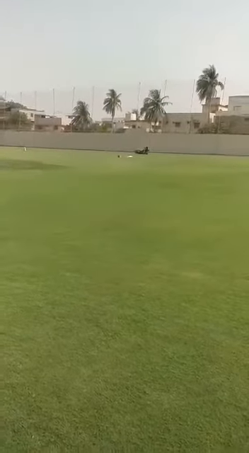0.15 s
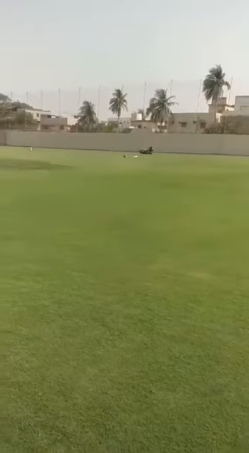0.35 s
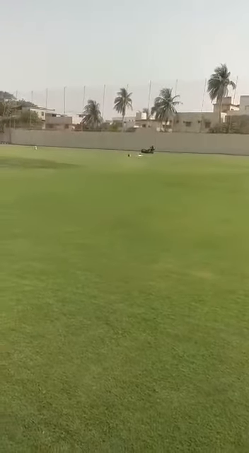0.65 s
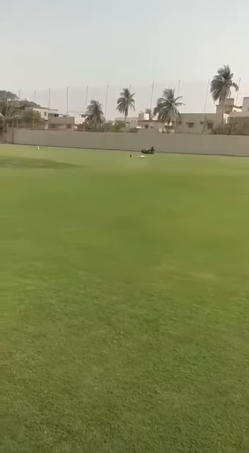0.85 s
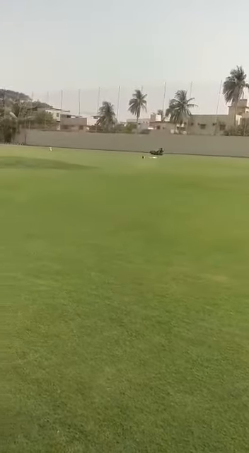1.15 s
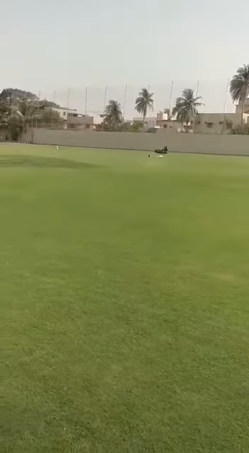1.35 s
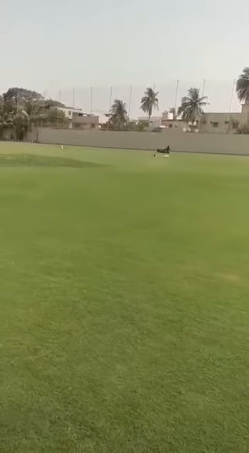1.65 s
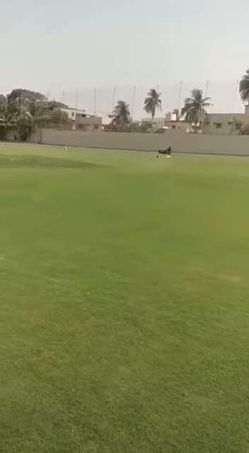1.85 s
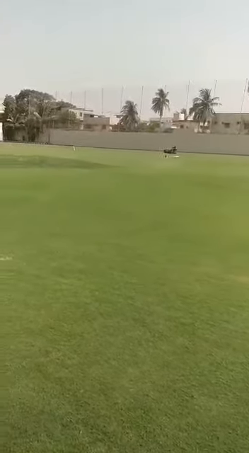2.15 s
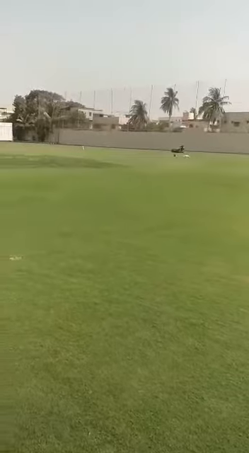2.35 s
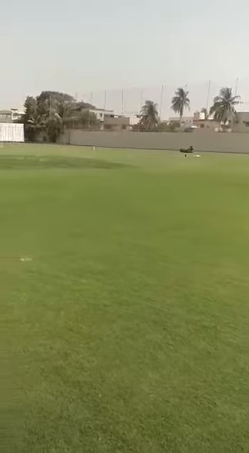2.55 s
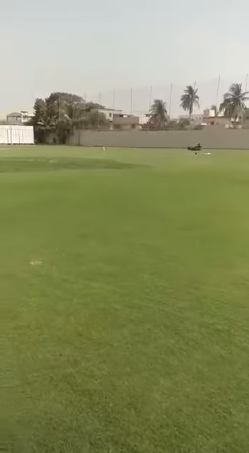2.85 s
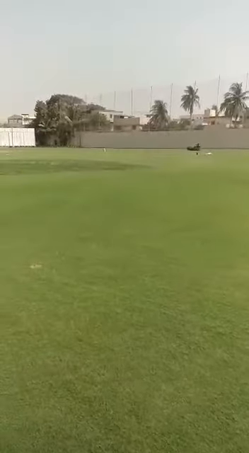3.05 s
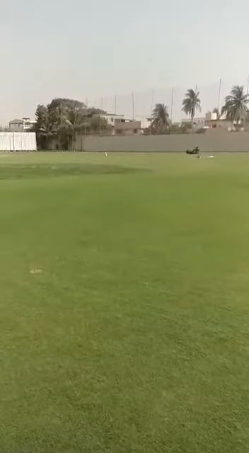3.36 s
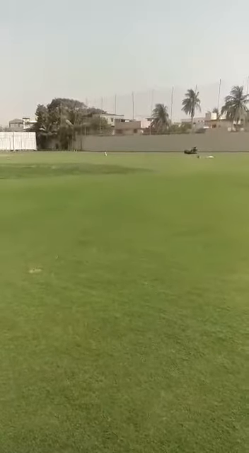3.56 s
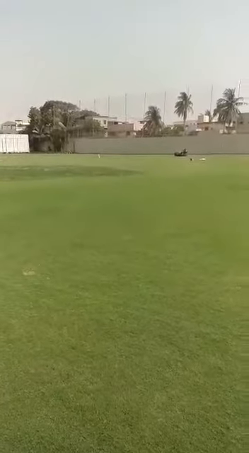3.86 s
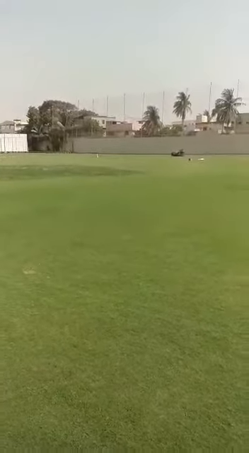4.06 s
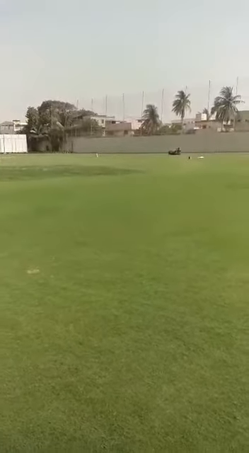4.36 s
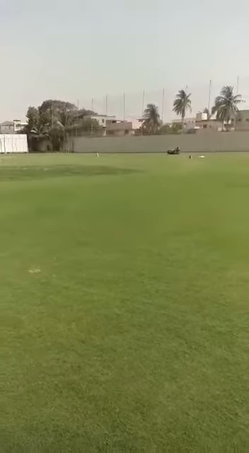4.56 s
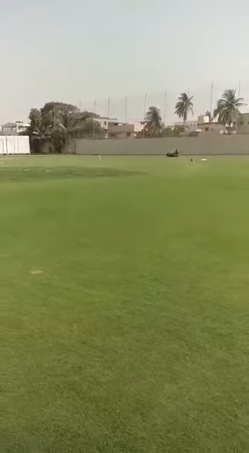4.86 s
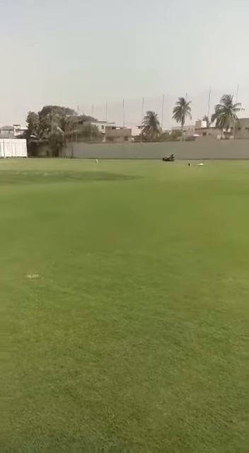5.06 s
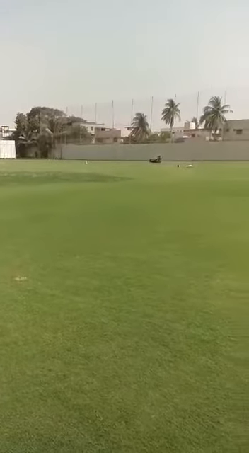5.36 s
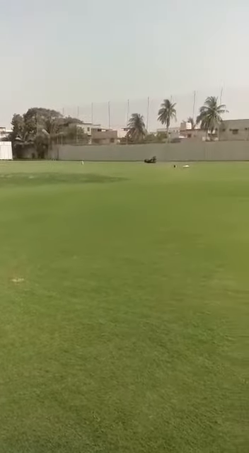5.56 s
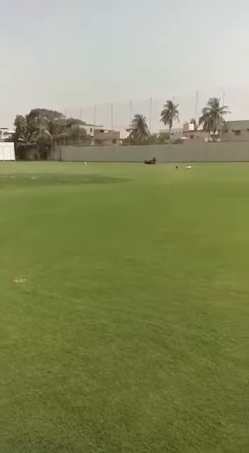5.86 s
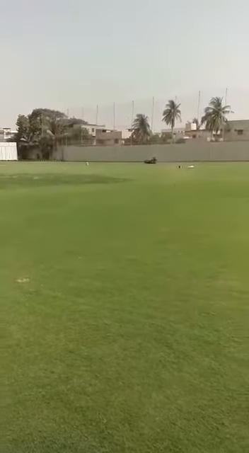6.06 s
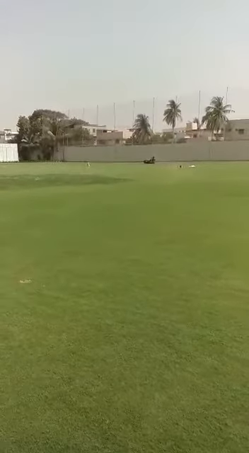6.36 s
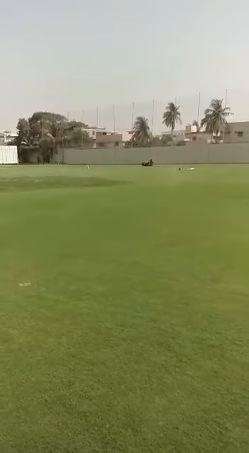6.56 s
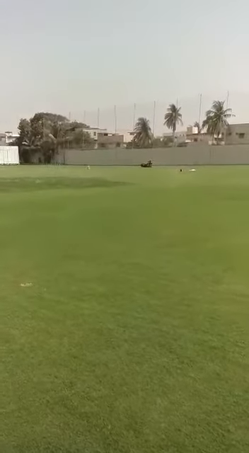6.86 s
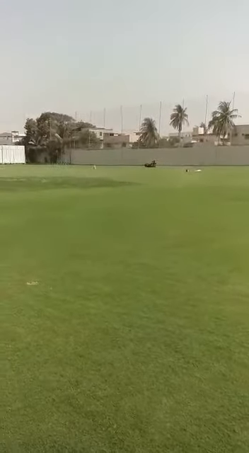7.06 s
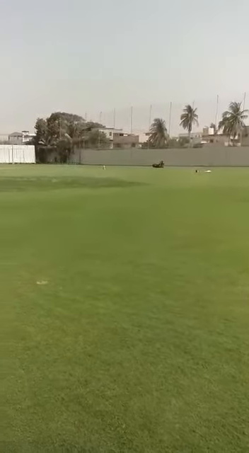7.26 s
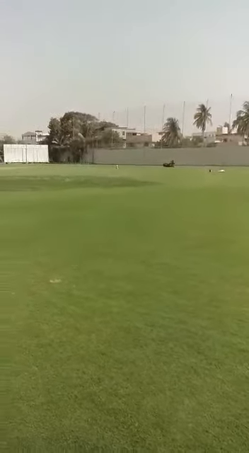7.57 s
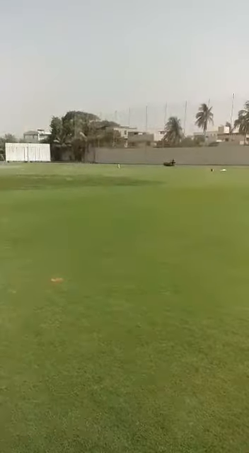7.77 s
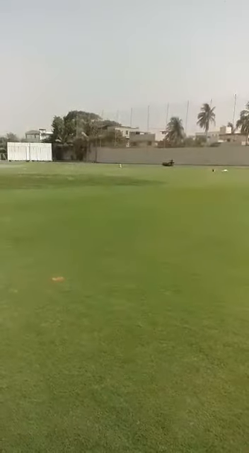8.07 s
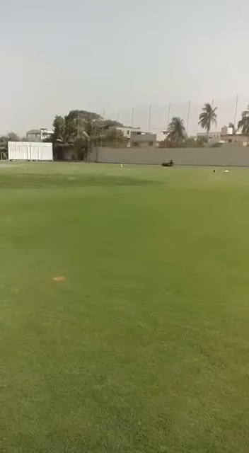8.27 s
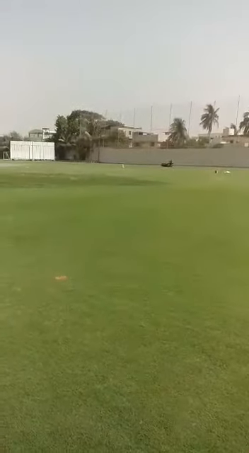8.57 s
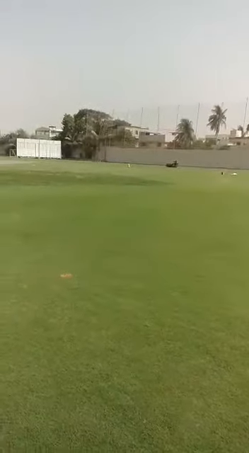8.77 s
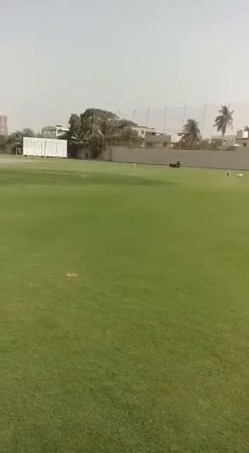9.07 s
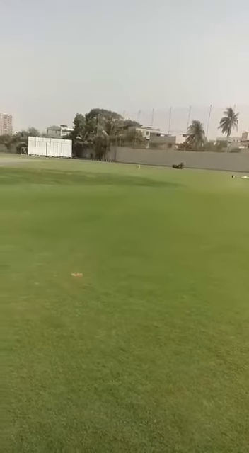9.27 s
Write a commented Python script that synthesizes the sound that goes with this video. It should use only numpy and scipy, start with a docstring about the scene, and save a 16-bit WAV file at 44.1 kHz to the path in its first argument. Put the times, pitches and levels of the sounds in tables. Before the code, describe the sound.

A steady distant mower: low engine hum, rough airy roar of blades, faint metallic whine, all wavering as the air moves. Soft leafy rustle sits above it, with a few barely audible whistles and thin bird-like twitters. An exposed stereo microphone catches early wind knocks, a calmer middle, renewed fluttering, then a cluster of heavy booming buffets in the last half second.

```python
"""Distant mower in a windy field

A ride-on mower drones far across an open field: engine lines, throbbing rumble, blade roar and thin whine.
Shaped noise makes grass and trees rustle; faint whistles and a thin twitter lie on top.
Wind buffets the microphone with churning noise and short pressure waves; strong ones duck the whole mix.
The two microphone ports hear nearly the same sound, one a little later and with opposite sign."""
import sys
import numpy as np
from scipy import signal
from scipy.fft import rfft, irfft, next_fast_len
from scipy.io import wavfile
from scipy.ndimage import uniform_filter1d, map_coordinates

SR = 44100
rng = np.random.default_rng(int(sys.argv[2]) if len(sys.argv) > 2 else 0)


def pcm_store(signal):
    """Save signal as 16-bit PCM."""
    levels = np.round(np.clip(np.atleast_2d(signal), -1, 1) * 32767)
    wavfile.write(sys.argv[1], SR, levels.astype(np.int16).T)


N = 415422
TIME = np.arange(N) / SR
# bins and frame times of the noise painter
FRAME_LENGTH, FRAME_HOP = 2048, 512
FRAME_HZ = np.fft.rfftfreq(FRAME_LENGTH, 1 / SR)
FRAME_S = np.arange(N // FRAME_HOP + 5) * FRAME_HOP / SR

CYCLE_HZ = 17.22  # four-stroke engine cycles a second
EDGE_HZ = 15450  # upper band limit

# engine lines, before fading: (multiple of the cycle rate, level [dB rms])
ENGINE_LINES = [(5, -46), (6, -42), (7, -38.5), (8, -42), (9, -39.5), (10, -34.5), (12, -43), (13, -42.5)]
# spectrum shape of the exhaust rumble: (frequency [Hz], relative density [dB])
RUMBLE_SPECTRUM = [(20, -1.5), (35, -10), (50, -18), (70, -15), (90, -3), (120, -0.5), (175, 0),
                   (200, -2.5), (228, -.5), (260, -14), (310, -14), (450, -27), (900, -70)]
# spectrum shape of the blade and casing roar: (frequency [Hz], relative density [dB])
ROAR_SPECTRUM = [(100, -40), (300, -2.5), (450, -1), (740, 0), (850, -4), (1050, -1.5), (1500, -2),
                 (1900, -3), (2350, -4.5), (2800, -7), (3500, -11), (7000, -44)]
# resonances of the machine, before drift and fading: (frequency [Hz], width [Hz], lift [dB])
MACHINE_RESONANCES = [(462, 15, 4.5), (583, 50, 5.5), (754, 15, 2), (930, 24, 2), (1157, 21, 6),
                      (1285, 75, 6.5), (1366, 18, 3.5), (1576, 370, 2), (2790, 170, 6.5), (3708, 89, 10)]
# colour of the roar as the mower turns: (time [s], low moan [dB], low mids [dB], high mids [dB])
HEADING_COLOUR = [(0, -0.8, -2.5, 3), (1.3, -0.5, -2, 3.5), (1.6, 0, -3.5, 5.5), (2.9, -2, -4, 3.5),
                  (3.6, 1.3, -1.8, 4.5), (4.4, -1, -4.5, 2.5), (5.5, -1.5, -0.5, 0.7), (6.4, 3, -5, 2.5),
                  (6.8, 1, 2, 4), (7.15, 3.5, -0.5, -0.5), (7.7, 1, -.7, -.8), (8.201, 1.8, -1, -1.8),
                  (8.7, -2.5, -2, 1.5), (9.4, 0, 0, 3)]
# how well the roar carries across the field: (time [s], level [dB])
ROAR_CARRY = [(0.0, -0.5), (0.6, -0.5), (1.1, 1.2), (1.5, -0.7), (1.7, 0.6), (2.1, -1), (2.4, 0), (3.2, -1),
              (3.4, 0.5), (3.8, -1.3), (5.4, 1.2), (5.8, 1.3), (5.9, 0), (6.8, -2.5), (7.5, 0.4), (8.3, -2),
              (8.9, 1.9), (9.4, -1.5)]
# whine of the spinning parts, before waver and fading: (frequency [Hz], level [dB rms])
WHINE_TONES = [(568, -51.5), (926, -56), (1147, -51)]
# strength of the wind at the microphone: (time [s], level [dB rms])
WIND_STRENGTH = [(0, -26), (.5, -26), (1.2, -36), (6.4, -38), (7.2, -26.5), (7.8, -28.5), (8.3, -33),
                 (8.75, -30), (9.15, -15.5), (9.42, -13.5)]
# short bursts of turbulence: (middle [s], length [s], level at the middle [dB rms], pitch [Hz])
WIND_FLURRIES = [(0.18, 0.05, -18, 200), (7.972, 0.062, -27, 175.5), (8.959, 0.11, -17, 192),
                 (9.32, 0.15, -20, 278)]
# eddies striking the microphone, before the ring:
# (time [s], level [dB], pitch [Hz], roundness: 2 a sharp spike, 8 a smooth wave)
WIND_BUFFETS = [(0.147, -9, 200, 8.1), (0.158, 10, 132, 1.33), (0.176, -1, 190, 8), (0.183, 0, 220, 12),
                (0.19, 1, 165, 4), (0.475, -5.5, 139, 9.7), (0.709, -14, 204, 6.9), (0.742, 2, 205, 5.1),
                (0.789, -6, 160, 5.6), (1.680, -11, 227, 6.1), (2.553, -7.5, 150, 2.7),
                (2.727, -13, 177, 10), (3.452, -8, 147, 12), (4.079, -7.5, 150, 4.6),
                (5.573, -8.5, 150, 7.6), (6.235, -11.5, 164, 7.2), (6.988, -7, 79.6, 3.3),
                (7.724, -7, 130, 2.5), (7.733, -1.5, 156, 2), (7.771, 2.5, 162, 3.2), (7.882, -8, 139, 9),
                (7.962, -12, 233, 6.7), (7.971, -6, 169, 4.9), (8.049, -2, 125, 5.2), (8.901, 4.5, 375, 8),
                (8.913, 3, 160, 3.4), (8.927, 6.5, 165, 3.5), (8.942, 0, 150, 5), (8.964, 4.5, 290, 3.3),
                (8.971, -1, 140, 5), (8.978, -1, 240, 3.5), (9.044, 2, 124, 3.4), (9.078, -5, 200, 7.9),
                (9.224, -5, 150, 4), (9.240, -2.5, 175, 4.9), (9.253, -1.5, 170, 5), (9.267, 7, 233, 5.9),
                (9.287, -16, 420, 3), (9.300, -6, 300, 3.9), (9.311, 6, 190, 3.8), (9.324, 1, 240, 3.7),
                (9.331, -5, 380, 3.4), (9.337, -9, 420, 2.5), (9.346, 5, 160, 5.6), (9.356, -3, 260, 4.3),
                (9.366, -7, 210, 4), (9.406, -3, 175, 5.7)]
# spectrum shape of rustling grass and leaves: (frequency [Hz], relative density [dB])
RUSTLE_SPECTRUM = [(800, -6), (2300, -1.5), (3200, 4), (3600, 2.5), (4400, 3.5), (5200, 0), (6500, -3),
                   (8300, -5.5), (9000, -8.5), (10500, -9.5), (11500, -16.5), (12400, -32), (15000, -33)]
# breeze in the grass: (time [s], relative rustle level [dB])
BREEZE_LEVEL = [(0.0, -2.7), (0.2, 1.4), (0.5, -1), (0.8, 3.5), (1.6, -0.6), (2.0, 0.4), (2.2, 1.5),
                (2.7, -0.8), (3.6, 3.5), (3.8, 1.3), (4.2, 2), (4.5, 0.6), (5.2, 0), (5.7, 1), (5.9, 3.5),
                (6.1, -1.4), (6.3, 1.5), (7.2, -2), (8.2, 1), (8.7, 0.6), (8.8, -3), (8.9, -1), (9.1, -2.5),
                (9.4, -1.8)]
# treble of the rustle: (time [s], relative level [dB])
RUSTLE_TREBLE = [(0.0, 9), (0.2, -1.9), (0.3, 1), (0.5, 2.0), (0.7, -7.5), (1.4, 0.8), (1.5, 5), (2.1, 3.5),
                 (2.3, -4.5), (2.6, 2.5), (3.0, -3), (3.1, -3), (3.3, -1.2), (3.6, -2.6), (3.7, 5.5),
                 (4.5, -3), (4.9, 2), (5.3, -1.5), (5.4, -3.5), (5.6, -3), (5.8, -1.2), (6.0, 1),
                 (6.4, -2.5), (6.7, 0), (7.0, -2), (7.1, -3), (7.2, -4.5), (7.5, -3), (7.6, -4.5),
                 (8.3, 0.8), (9.2, -1.1), (9.4, 3.5)]
# faint thin whistles: (middle [s], length [s], level at the middle [dB rms], frequency before waver [Hz])
THIN_WHISTLES = [(1.31, .14, -45, 10100), (2.95, .12, -47, 6890), (3.86, .12, -47, 10100),
                 (5.8, .18, -50, 10100)]
# spells of thin twitter: (middle [s], length [s], level at the middle [dB rms])
TWITTER_SPELLS = [(.05, .3, -47), (1.0, .5, -67), (1.87, .5, -45), (2.35, .4, -48), (7.9, 0.28, -51),
                  (8.5, .5, -47)]
# right port against left: (frequency [Hz], coherence, level [dB], extra phase lag [rad])
PORT_RESPONSE = [(250, .998, -.2, 0), (700, .988, -.3, .14), (1100, .98, -.4, .25), (1300, .996, -.4, .15),
                 (1750, .95, -.9, .23), (2200, .88, -1.1, .36), (2400, .997, -.2, .56), (2480, 1, 0, .47),
                 (2590, 1, 0, .29), (2700, .988, -.4, .3), (3000, .89, -1.7, .34), (3450, .87, -2.2, .5),
                 (3850, .96, -2.1, .36), (4400, .86, -2.4, .47), (4900, .88, -2.8, .55),
                 (5150, .97, -1.6, .47), (5500, .83, -3.3, .46), (6500, .83, -4, .5),
                 (7400, .73, -4.4, .53), (7850, .82, -3.6, .45), (9000, .7, -4.6, .5), (10600, .72, -4, .4),
                 (11500, .55, -3, .3), (13200, .8, -1, .46), (15000, .5, -2, .46)]


def gain_of(db):
    """Decibels to amplitude."""
    return 10 ** (np.asarray(db) / 20)


def evened(x):
    """Scales to rms 1."""
    return x / np.sqrt(np.mean(x ** 2) + 1e-20)


def read(points, hz, axis=1):
    """One column of a spectrum table, read on a log-frequency axis."""
    table = np.transpose(points)
    return np.interp(np.log(hz + 1), np.log(table[0] + 1), table[axis])


def follow(rows, t):
    """The columns of a time curve at the times t."""
    s, *columns = np.transpose(rows)
    return [np.interp(t, s, column) for column in columns]


def bell(hz, centre, width):
    """Shape of a resonance, 1 at its centre."""
    return 1 / (1 + (2 * (hz - centre) / width) ** 2)


def swell(middle, length):
    """One smooth rise and fall."""
    return np.cos(np.pi * np.clip((TIME - middle) / length, -.5, .5))


def wander(rate, t=TIME):
    """Slow random drift at the times t, from noise of rms 1 softened above rate [Hz]."""
    hz = np.fft.rfftfreq(len(FRAME_S), FRAME_S[1])
    spectrum = rfft(rng.standard_normal(len(FRAME_S))) / (1 + (hz / rate) ** 2)
    slow = irfft(spectrum, len(FRAME_S))
    return np.interp(t, FRAME_S, evened(slow))


def noise(field_db, patchy_db):
    """Two unrelated noises, rms 1, painted in dB over time and frequency and fading in random patches."""
    shape = (len(FRAME_S), len(FRAME_HZ))
    patches = uniform_filter1d(rng.standard_normal(shape), size=9, axis=0)
    patches = uniform_filter1d(patches, size=36, axis=1)
    z = rng.standard_normal((2, *shape)) + 1j * rng.standard_normal((2, *shape))
    z *= gain_of(field_db + patchy_db * evened(patches))
    _, sound = signal.istft(z, nperseg=FRAME_LENGTH, noverlap=FRAME_LENGTH - FRAME_HOP,
                            time_axis=1, freq_axis=2)
    return evened(sound[:, :N])


def exhaust(rumble_db=-23.5, drift=0.0025, fading_db=1.5, throb=0.16, uneven_db=0.79):
    """Engine lines fade in the moving air, inside an uneven noise rumble that throbs once a cycle."""
    cycle_hz = CYCLE_HZ * (1 + drift * wander(1.15))
    angle = 2 * np.pi * np.cumsum(cycle_hz) / SR
    out = gain_of(rumble_db) * noise(read(RUMBLE_SPECTRUM, FRAME_HZ), patchy_db=-1.04)
    out *= 1 + throb * np.cos(angle)
    out *= gain_of(uneven_db * wander(CYCLE_HZ))
    for order, db in ENGINE_LINES:
        line = np.sqrt(2) * np.cos(order * angle + 2 * np.pi * rng.random())
        out[0] += gain_of(db + fading_db * wander(3.2)) * line  # only in the shared sound
    return out


def blades(roar_db=-29.0, surge_db=0.27, drift=0.008, fading_db=0.9):
    """Rushing air in the deck surges on the wind; its resonances drift together and fade one by one."""
    shift = 1 + drift * wander(1, FRAME_S)[:, None]
    colour = read(ROAR_SPECTRUM, FRAME_HZ)
    for hz, width, db in MACHINE_RESONANCES:
        lift = db + fading_db * wander(1.9, FRAME_S)[:, None]
        colour = colour + lift * bell(FRAME_HZ, hz * shift, width)
    # low moan, low mids, high mids: (centre [Hz], width [Hz])
    bands = [(720, 260), (1290, 260), (1680, 380)]
    for lift, (hz, width) in zip(follow(HEADING_COLOUR, FRAME_S), bands):
        colour = colour + lift[:, None] * bell(FRAME_HZ, hz, width)
    level_db = roar_db + follow(ROAR_CARRY, TIME)[0] + surge_db * wander(5.7)
    return gain_of(level_db) * noise(colour, patchy_db=0.92)


def whine(unsteady=0.0071, fading_db=3):
    """Thin sine tones of the machine waver together and fade one by one on the way across the field."""
    spin = np.cumsum(1 + unsteady * wander(12.9)) / SR
    out = np.zeros(N)
    for hz, db in WHINE_TONES:
        tone = np.sqrt(2) * np.sin(2 * np.pi * hz * spin)
        out += gain_of(db + fading_db * wander(4.9)) * tone
    return out


def turbulence(hz, reach=1.77, softness=0.56):
    """Churning air as noise banded around a pitch, rms 1, its highest crests rounded off."""
    band = signal.butter(2, [hz / reach, hz * reach], "bandpass", fs=SR, output="sos")
    churn = evened(signal.sosfilt(band, rng.standard_normal(N)))
    return evened(np.tanh(softness * churn))


def bluster(bluster_hz=105):
    """Low turbulence on the microphone follows the strength of the wind."""
    return gain_of(follow(WIND_STRENGTH, TIME)[0]) * turbulence(bluster_hz, reach=1.49)


def flurries():
    """Each flurry is one quick rise and fall of higher-pitched turbulence."""
    return sum(gain_of(db) * swell(middle, length) * turbulence(hz)
               for middle, length, db, hz in WIND_FLURRIES)


def eddy(t, hz, roundness=4, lean=-0.6):
    """A short pressure wave around t = 0; roundness adds swings and lean [rad] tilts its shape."""
    wave = (1 - 2j * np.pi * hz * t / roundness) ** -(roundness + 1)
    return (wave * np.exp(-1j * lean)).real


def buffets(ring_hz=160, ring_q=3.57, ring_db=-2, tip_db=-21, tip_hz=600):
    """Strong eddies hit the microphone, the hardest with a sharp tip; the wind port booms after each."""
    out = np.zeros(N)
    for s, db, hz, roundness in WIND_BUFFETS:
        near = abs(TIME - s) < .08
        t = TIME[near] - s
        out[near] += gain_of(db) * eddy(t, hz, roundness)
        if db > 0:
            out[near] += gain_of(db + tip_db) * eddy(t, tip_hz)
    boom = signal.lfilter(*signal.iirpeak(ring_hz, ring_q, fs=SR), out)
    return (out + gain_of(ring_db) * boom) / np.sqrt(1 + gain_of(ring_db))


def ripples(ripple_db=-35.5, per_s=7, low_hz=70, high_hz=170):
    """Small eddies of random size, per_s at each of four pitches, keep the low wind noise lumpy."""
    t = np.arange(-2048, 2049) / SR
    out = np.zeros(N)
    for hz in np.geomspace(low_hz, high_hz, num=4):
        arrivals = (rng.random(N) < per_s / SR) * rng.uniform(-0.64, 1, N)
        out += np.sqrt(hz) * signal.oaconvolve(arrivals, eddy(t, hz), "same")
    return gain_of(ripple_db) * evened(out)


def rustle(rustle_db=-32.5, dull_hz=4500, bright_hz=9500, top_flicker_db=1.4, sway_db=0.5):
    """Noise hiss of the breeze in grass and leaves sways a little, and its top comes and goes."""
    level = follow(BREEZE_LEVEL, FRAME_S)[0] + sway_db * wander(15.0, FRAME_S)
    treble = follow(RUSTLE_TREBLE, FRAME_S)[0] + top_flicker_db * wander(34, FRAME_S)
    top = np.interp(FRAME_HZ, [dull_hz, bright_hz], [0, 1])
    field = read(RUSTLE_SPECTRUM, FRAME_HZ) + level[:, None] + treble[:, None] * top
    return gain_of(rustle_db) * noise(field, patchy_db=1.06 + 0.29 * top)


def whistles(waver=0.0019):
    """Brief high sine tones that waver slightly."""
    bent_time = np.cumsum(1 + waver * wander(30)) / SR
    out = np.zeros(N)
    for middle, length, db, hz in THIN_WHISTLES:
        tone = np.sqrt(2) * np.sin(2 * np.pi * hz * bent_time)
        out += gain_of(db) * swell(middle, length) * tone
    return out


def shrills(shrill_hz=6400, width_hz=170):
    """Thin twitter, perhaps of small birds far off: noise in a band so narrow that it flutters."""
    edges = [shrill_hz - width_hz / 2, shrill_hz + width_hz / 2]
    band = signal.butter(2, edges, "bandpass", fs=SR, output="sos")
    twitter = evened(signal.sosfilt(band, rng.standard_normal(N)))
    return twitter * sum(gain_of(db) * swell(middle, length) for middle, length, db in TWITTER_SPELLS)


def ports(shared, stray, lag_ms=.372, sway_ms=.002):
    """The right port hears the left's sound inverted and late, part stray; the lag sways with the hand."""
    size = next_fast_len(N + 1024)
    hz = np.fft.rfftfreq(size, 1 / SR)
    same = np.clip(read(PORT_RESPONSE, hz), 0, 1)
    right = same * rfft(shared, size) + np.sqrt(1 - same ** 2) * rfft(stray, size)
    phase = 2 * np.pi * hz * lag_ms / 1000 + read(PORT_RESPONSE, hz, axis=3)
    response = -gain_of(read(PORT_RESPONSE, hz, axis=2)) * np.exp(-1j * phase)
    right = irfft(response * right, size)
    when = TIME + sway_ms / 1000 * wander(4)
    right = map_coordinates(right, [when * SR], order=5, mode="nearest")
    return np.array([shared, right])


def scene():
    """Mower and field far off, wind right on the microphone."""
    shared, stray = exhaust() + blades() + rustle()
    wind = bluster() + flurries() + buffets() + ripples()
    return ports(shared + whine() + whistles() + shrills() + wind, stray)


def gain_control(x, threshold_db=-17.5, slope=0.73, recovery_db_per_s=10, start_db=8.5, late_ms=1.2):
    """Short-term power over the threshold ducks both channels; the gain then creeps back up."""
    power = abs(uniform_filter1d((x ** 2).mean(0), size=260))
    over_db = slope * np.maximum(10 * np.log10(power + 1e-12) - threshold_db, 0)
    recovered = recovery_db_per_s * TIME
    # the deepest duck so far, less what has recovered; it opens already ducked
    duck_db = np.maximum.accumulate(np.maximum(over_db + recovered, start_db)) - recovered
    smooth_db = uniform_filter1d(duck_db, size=200)
    late = TIME - late_ms / 1000
    return x * gain_of(-np.interp(late, TIME, smooth_db))


def record(dry, low_cut_hz=44):
    """Gain control, a wind low-cut, then the upper band limit."""
    low_cut = signal.butter(3, low_cut_hz, "highpass", fs=SR, output="sos")
    cut = signal.sosfilt(low_cut, gain_control(dry))
    band_limit = signal.firwin(1023, EDGE_HZ, window=("kaiser", 9), fs=SR)
    return signal.oaconvolve(cut, band_limit[None], "same")


dry = scene()
out = record(dry)
pcm_store(out)
```